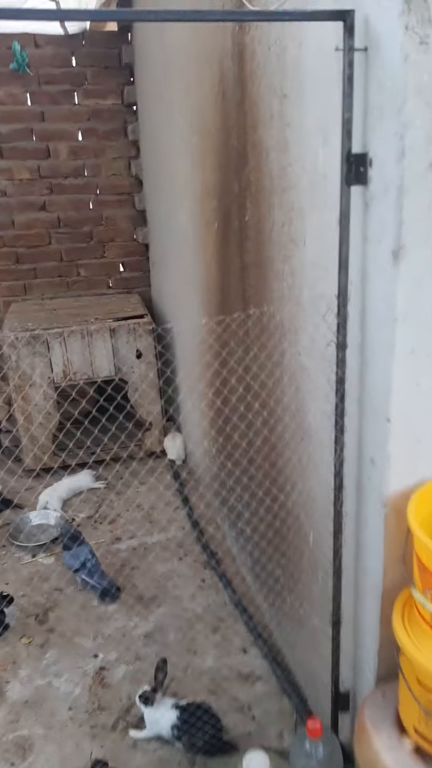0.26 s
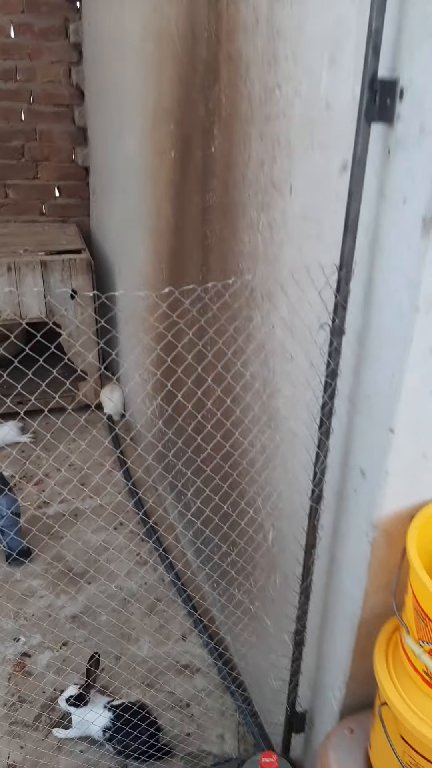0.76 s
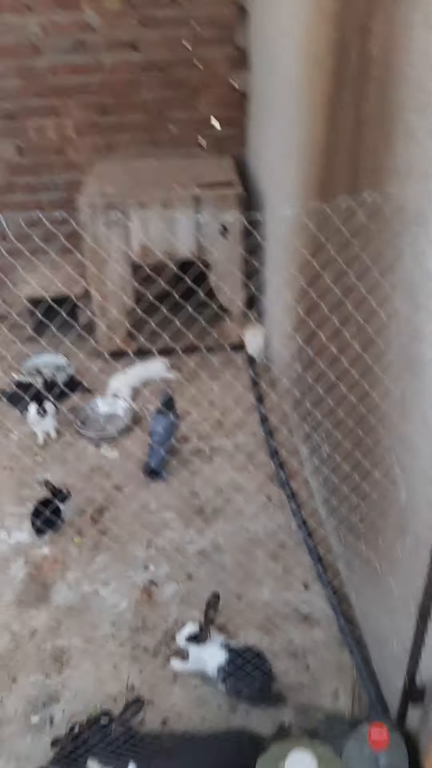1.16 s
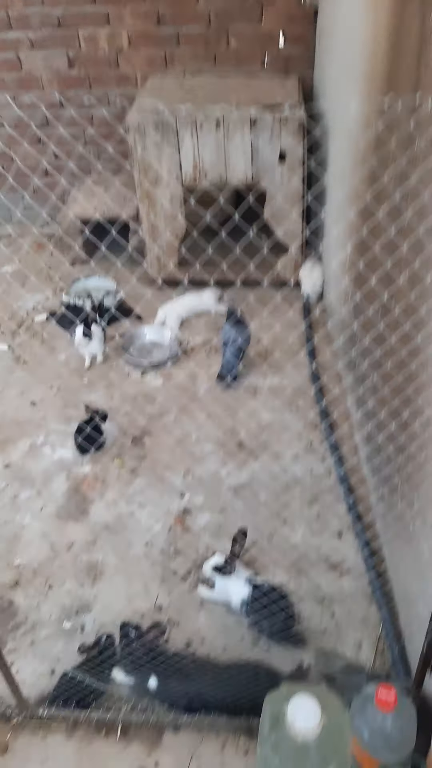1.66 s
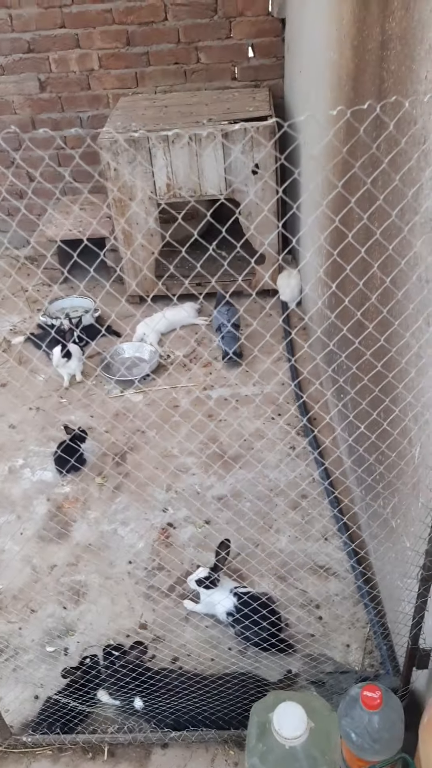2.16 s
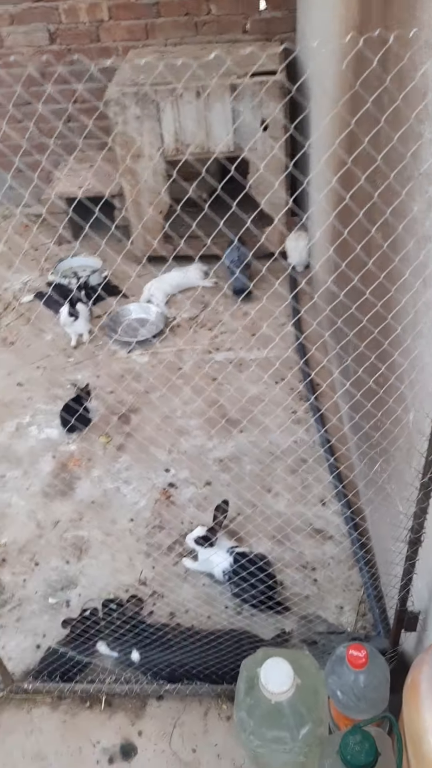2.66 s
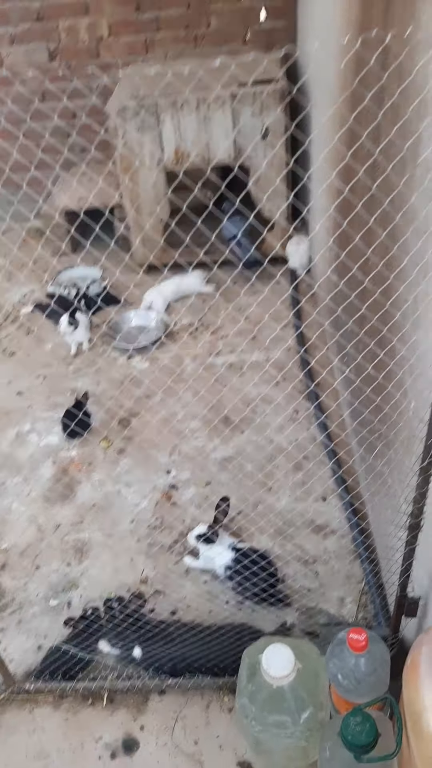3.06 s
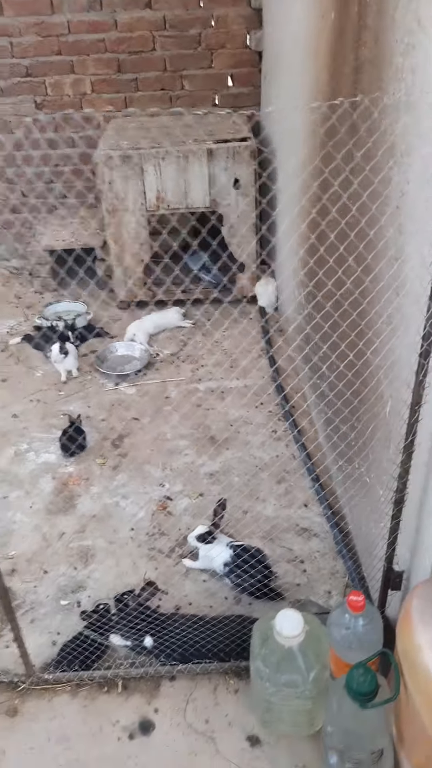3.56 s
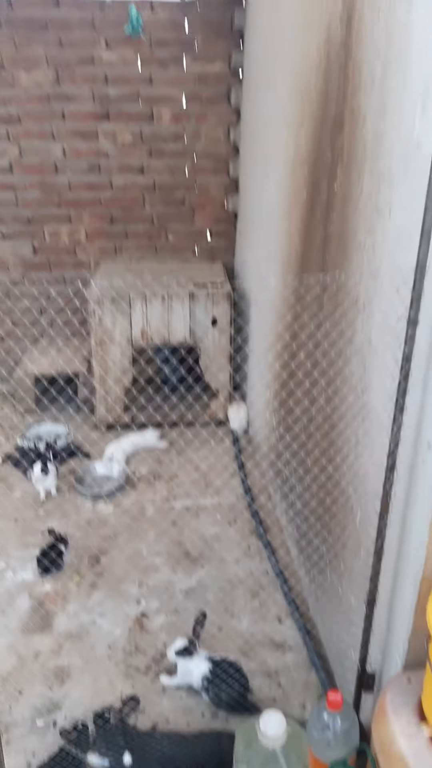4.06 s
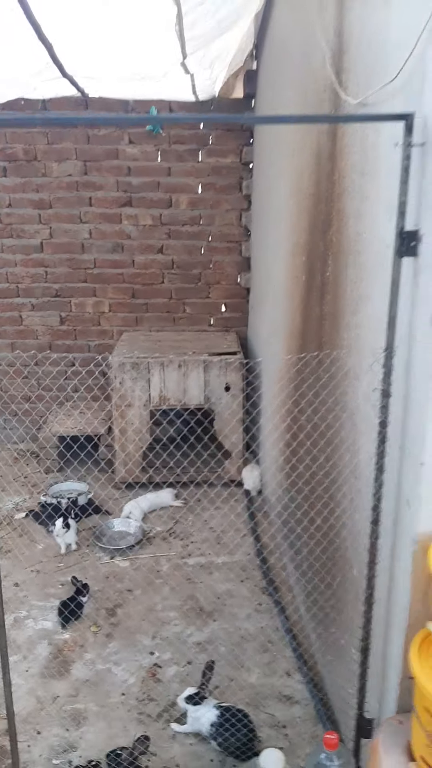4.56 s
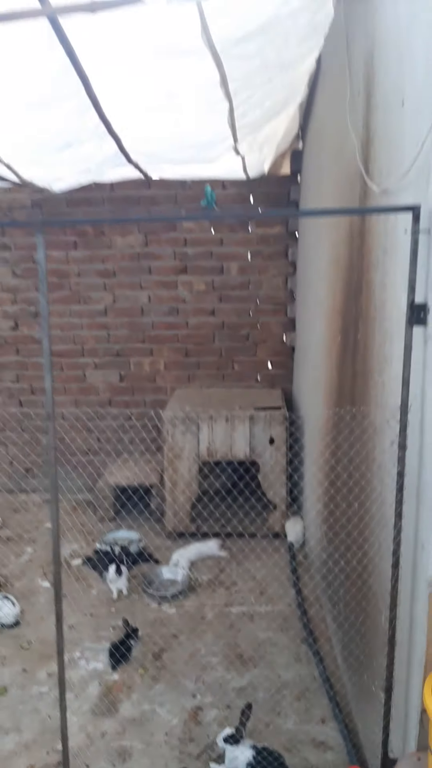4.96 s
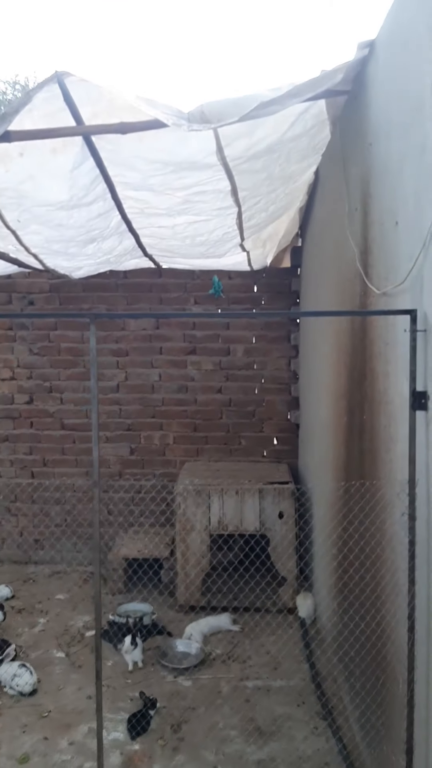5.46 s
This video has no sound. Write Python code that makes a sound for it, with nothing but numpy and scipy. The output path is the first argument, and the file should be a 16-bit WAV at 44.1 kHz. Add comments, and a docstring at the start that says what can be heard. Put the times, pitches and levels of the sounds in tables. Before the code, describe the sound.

Pigeons move around a wooden hutch: a strong boxy thud at the start, airy feather swishes, then a sharp crackly flutter about a second in. The middle is quiet, with thin sparrow chirps echoing softly from outside. Small claw-like clicks and faint wooden bumps return, growing more frequent near the end, where a pure, low coo rolls in and is cut off. Close outdoor stereo pickup with little deep bass.

```python
"""A walled yard with a wooden hutch. From the start pigeons thump on the boards (slaps driving wood resonances)
and rustle their feathers (swelling hiss), among short airy, dull, crackling or rustling bursts (tuned grain
noise), over outdoor noise and a faint hum. Small clicks soon join as brief rings, then sparrows beyond the
wall as chirps and whistles (gliding sines), with echoes scattered by hedges and roofs; near sources echo in
the yard. At the very end one pigeon starts to coo, an almost pure tone rolling in by throbs."""
import sys
import numpy as np
from scipy import signal
from scipy.io import wavfile

SR = 44100
rng = np.random.default_rng(int(sys.argv[2]) if len(sys.argv) > 2 else 0)


def voltage_ratio(decibels):
    """Convert decibels (scalar or array-like) to amplitude ratios, 20 dB per decade."""
    exponent = np.asarray(decibels, float) / 20
    return 10 ** exponent


def digitize_waveform(pressure):
    """Quantize a signal to 16-bit integers and store it at the path in sys.argv[1].

    Rows of a 2-D input are taken as channels; values are limited to [-1, 1].
    """
    field = np.atleast_2d(pressure).T
    bounded = np.clip(field, -1, 1)
    quanta = np.round(bounded * 32767).astype(np.int16)
    wavfile.write(sys.argv[1], SR, quanta)


N = 252693   # length in samples


def rms_one(x):
    """Scale to rms 1."""
    return x / np.sqrt(np.mean(x ** 2) + 1e-20)


def in_time(rows):
    """Table columns as sample-rate curves."""
    s, *columns = np.transpose(rows)
    return [np.interp(np.arange(N) / SR, s, c) for c in columns]


def at_hz(points, hz):
    """Read a spectrum on a log frequency axis."""
    points = np.array(points)
    return np.interp(np.log(hz), np.log(points[:, 0]), points[:, 1])


def drift(rate):
    """Smooth random wandering of rms 1, from noise low-passed near rate [Hz]."""
    r = np.exp(-80 * np.pi * rate / SR)   # runs at one value per 40 samples
    noise = rng.standard_normal(N // 40 + 2002)
    slow = signal.lfilter([1], [1, -2 * r, r * r], noise)[2000:]
    return np.interp(np.arange(N) / 40, np.arange(len(slow)), rms_one(slow))


def resonate(x, modes):
    """Parallel resonances of alternating sign."""
    out = 0
    for k, (hz, width, db) in enumerate(modes):
        r = np.exp(-np.pi * width / SR)
        b = [(1 - r * r) / 2, 0, (r * r - 1) / 2]
        a = [1, -2 * r * np.cos(2 * np.pi * hz / SR), r * r]
        out = out + (-1) ** k * voltage_ratio(db) * signal.lfilter(b, a, x)
    return out


def grains(per_s, spread_db):
    """Dense random clicks of uneven size, rms 1."""
    sizes = voltage_ratio(spread_db * np.minimum(rng.exponential(1, N), 5)) * rng.choice([-1, 1], N)
    return rms_one(sizes * (rng.random(N) < per_s / SR))


# how alike noise is on the two sides: (frequency [Hz], left-right correlation [0 to 1])
LIKENESS = [(60, 0.35), (250, 0.85), (600, 0.4), (1500, 0), (4000, 0), (12000, 0)]


def coloured(spectrum, patchy_db):
    """Half-octave bands of stereo noise, each with its own level, flicker and likeness; rms 1."""
    out, edges = 0, 35 * 2 ** np.arange(0, 9.1, .5)
    white = rng.standard_normal((2, 2, N))
    for k, (low, high) in enumerate(zip(edges, edges[1:])):
        hz = np.sqrt(low * high)
        if hz > spectrum[0][0]:
            band = signal.butter(2, [low, high], "band", fs=SR, output="sos")
            mid, side = signal.sosfilt(band, white[k % 2])   # neighbouring bands use different noise
            alike = np.clip(at_hz(LIKENESS, hz), -1, 1)
            gain = voltage_ratio(at_hz(spectrum, hz) + patchy_db * drift(12.7))
            stereo = np.sqrt(1 + alike) * mid + np.sqrt(1 - alike) * side * [[1], [-1]]
            out = out + gain * stereo
    return rms_one(out)


# wing beats on the hutch: (time [s], lower body level [dB], upper body level [dB], length [s])
THUMPS = [(0.0, -39.5, -43, 0.069), (1.181, -69, -68.5, 0.28), (2.317, -70, -66.5, 0.015),
          (2.795, -57.5, -68, 0.17), (3.267, -57, -62, 0.098), (3.739, -51, -62.5, 0.046),
          (3.794, -79, -64, 0.052), (4.522, -54, -58.5, 0.038), (4.588, -67.5, -72, 0.087),
          (4.884, -101, -68.5, 0.047), (5.25, -47, -57, 0.035), (5.315, -56.5, -66, 0.048),
          (5.429, -53.5, -67, 0.013), (5.601, -50, -57, .14)]
# low resonances of the hutch: (frequency [Hz], width [Hz], relative level [dB])
HUTCH = [(115, 37, -1.5), (211.6, 36.6, 0), (216.4, 67, 0), (300, 76.5, -3.5), (440.5, 26.4, -9)]
# high resonances of the hutch: (frequency [Hz], width [Hz], relative level [dB])
HUTCH_UPPER = [(490, 68, -1), (800, 280, 1), (1080, 323, 3.5), (1840, 1500, -5), (2454, 980, -7)]


def thumps():
    """Each beat is a slap of many small contacts that drives the hutch while the wing presses, then dies."""
    rise_s, fall_s, press_decay_s = 0.00035, 0.04, 0.18
    low, upper, t = np.zeros(N), np.zeros(N), np.arange(SR // 2) / SR
    for s, db, upper_db, length in THUMPS:
        release = np.maximum(t - abs(length), 0) / fall_s
        shape = (1 - np.exp(-t / rise_s)) * np.exp(-release - t / press_decay_s)
        at = int(s * SR)
        low[at:at + len(t)] += voltage_ratio(db) * shape[:N - at]
        upper[at:at + len(t)] += voltage_ratio(upper_db) * shape[:N - at]
    contacts = grains(1500.0, 4.3)
    # small parts sound from apart
    scattered = contacts + 0.76 * np.array([grains(1300.0, 2.5), grains(1500.0, 1.0)])
    # each body is levelled by its response to the steady contacts
    low_scale, upper_scale = [1 / np.std(resonate(contacts, modes)) for modes in (HUTCH, HUTCH_UPPER)]
    bass_cut = signal.butter(2, 85, "high", fs=SR, output="sos")
    low_body = low_scale * signal.sosfilt(bass_cut, resonate(low * contacts, HUTCH))
    upper_body = upper_scale * resonate(upper * scattered, HUTCH_UPPER)
    return (low_body + upper_body) * voltage_ratio(np.array([[2.5], [-2.5]]))   # leans left


# short rushes of coloured noise, heard as air, dull thumps, a crackle and rustling:
# (time [s], length [s], frequency [Hz], width of each of two passes [Hz], level [dB])
BURSTS = [(.0, 0.32, 1440, 1920, -55.5), (0.048, 0.46, 251, 118, -56), (0.424, 0.47, 1860, 870, -67.5),
          (0.908, 0.067, 1900, 800, -48.5), (.912, .045, 4370, 300, -51.5), (0.916, 0.15, 267, 455, -55.5),
          (0.957, 0.041, 2450, 1710, -40.5), (0.987, 0.034, 2450, 1220, -42.5),
          (1.227, 0.24, 1840, 1280, -69.5), (1.546, 0.17, 5640, 2630, -66.5), (1.899, 0.071, 435, 800, -57),
          (2.684, 0.2, 346, 192, -69), (2.914, 0.035, 620, 800, -48), (2.916, 0.014, 6200, 2400, -47.5),
          (4.69, 0.59, 2010, 524, -72.5), (4.99, 0.28, 1640, 450, -61.5), (5.371, 0.066, 1840, 886, -63.5),
          (3.468, 0.062, 650, 250, -65), (5.428, .09, 370, 243, -59.5), (5.536, 0.065, 300, 199, -56),
          (5.644, 0.14, 2140, 1230, -62), (5.596, 0.13, 480, 152, -52)]


def noise_bursts():
    """Grainy noise, swelling and dying away, each burst coloured by its own resonance."""
    out = np.zeros((2, N))
    grit = grains(4000.0, 2.7) + 1.22 * np.array([grains(4000.0, 3.2), grains(4000.0, 4.9)])
    for s, length, hz, width, db in BURSTS:
        at = int(s * SR)
        piece = grit[:, at:at + int(length * SR)]
        colour = [(hz, width, 0)]
        swell = np.sqrt(np.sin(np.linspace(0, np.pi, piece.shape[1])).clip(0))
        burst = rms_one(resonate(resonate(piece, colour), colour))
        out[:, at:at + piece.shape[1]] += voltage_ratio(db) * swell * burst
    return out


# colour of the feather hiss: (frequency [Hz], relative level per Hz [dB])
HISS = [(1760, -46), (3000, 4.5), (3260, -7), (4430, -8.5), (5270, -3), (6810, -8.5), (8750, -17.5),
        (12800, -13), (15800, -7.5)]
# birds shuffling all about, as a steady hiss: (time [s], level [dB])
SHUFFLE = [(0, -64), (.3, -62), (.8, -67.5), (1.3, -68), (2.1, -80.5), (2.8, -74.5), (3.5, -69.5),
           (3.85, -60.5), (4.2, -67), (4.7, -68.5), (5.1, -69.5), (5.73, -70)]
# shakes of the feathers: (time of the peak [s], peak level [dB], swell [s], fade [s])
RUSTLES = [(0, -45.5, .01, 0.066), (.305, -50, 0.08, 0.032), (.63, -56, 0.14, 0.058),
           (0.899, -48.5, 0.0084, 0.097), (.995, -46, 0.068, 0.037), (1.2, -62.5, 0.033, 0.026),
           (1.9, -53, 0.017, 0.043), (2.18, -68.5, .003, 0.098), (2.34, -64.5, 0.03, .12),
           (2.92, -48, 0.0071, 0.025), (3.193, -58, 0.048, 0.025), (3.29, -52.5, 0.0024, 0.019),
           (3.59, -69, 0.0066, .15), (4.0, -56, 0.019, 0.031), (4.332, -58.5, 0.0089, 0.028),
           (4.515, -59.5, 0.0057, 0.014), (4.82, -62.5, 0.028, 0.025), (4.87, -60.5, 0.018, 0.12),
           (5.2, -63.5, 0.0097, 0.047), (5.41, -60.5, 0.038, .04)]


def feathers():
    """Fine hiss off the barbs, a little to the right: each shake swells and fades over the shuffling."""
    t, power = np.arange(N) / SR, voltage_ratio(in_time(SHUFFLE)[0]) ** 2
    for s, db, swell, fade in RUSTLES:
        distance = np.where(t < s, (s - t) / abs(swell), (t - s) / abs(fade))
        power = power + voltage_ratio(db) ** 2 * np.exp(-2 * distance)
    return np.sqrt(power) * coloured(HISS, patchy_db=1.7) * voltage_ratio(np.array([[-1.2], [1.2]]))


# the yard's low stir: (time [s], level [dB])
STIR = [(0, -38), (.5, -64.5), (1.3, -68), (1.5, -68.5), (2.1, -71.5), (2.7, -73.5), (3.6, -65.5),
        (4.2, -70), (4.9, -72.5), (5.2, -67), (5.73, -64.5)]
# colour of the outdoor air: (frequency [Hz], relative level per Hz [dB])
YARD = [(24, -36), (40, -2), (151, -6.5), (422, -8), (467, -12.5), (965, -12.5), (1070, -75), (1370, -10.5),
        (2500, -28.5), (4460, -34), (16000, -57)]


def background():
    """Outdoor air noise, and a faint wavering hum from far off made of noise through a narrow resonance."""
    hum = [(1040, 16, 0)]   # (frequency [Hz], width of each pass [Hz], level [dB])
    tone = rms_one(resonate(resonate(rng.standard_normal(N), hum), hum))
    air = voltage_ratio(in_time(STIR)[0]) * coloured(YARD, patchy_db=3.0)
    return air + voltage_ratio(-84 + 0.5 * drift(9.2)) * tone


# small clicks of claws and quill tips: (time [s], level before the decay [dB], ringing frequency [Hz])
TICKS = [(0.082, -34.5, 7000), (0.161, -30.5, 5800), (0.177, -47, 6870), (1.145, -49.5, 1040),
         (2.18, -53, 5000), (2.324, -62, 2200), (2.917, -35, 6500), (3.293, -33.5, 6760), (3.59, -41, 6760),
         (4.141, -36, 12000), (4.06, -52.5, 1090), (4.296, -50, 2200), (4.338, -44.5, 1300),
         (4.509, -45, 9000), (4.613, -45, 2360), (4.666, -38.5, 6700), (4.816, -38, 6600)]


def ticks():
    """Each short click is a sine that dies within about a cycle."""
    cycles = 0.9   # decay time, in periods of the ring
    out, t = np.zeros(N), np.arange(400) / SR
    for s, db, hz in TICKS:
        at = int(s * SR)
        out[at:at + 400] += voltage_ratio(db) * np.sin(2 * np.pi * hz * t) * np.exp(-t * hz / cycles)
    return out


def sparrows(notes, held):
    """Near-sine glides, pitch and level fluttering fast; whistles fade as they fall, steep chirps blow harder."""
    fall_hz_per_s, shortest_fall_s = 17000, .05   # end of a whistle
    chirp_bend, steep_hz_per_s = 1.25, 60000   # flattening of a chirp; slope that adds power
    out, waver = np.zeros(N), drift(300)
    for s, length, from_hz, to_hz, db in notes:
        u, at = np.linspace(0, 1, int(length * SR)), int(s * SR)
        if held:
            fall_s = max(abs(from_hz - to_hz) / fall_hz_per_s, shortest_fall_s)
            fall = min(fall_s / length, 1)   # share of the note spent gliding
            fallen = np.sin(np.pi / 2 * (1 - (1 - u) / fall).clip(0)) ** 2
        else:
            fallen = 1 - (1 - u) ** chirp_bend
        hz = from_hz + (to_hz - from_hz) * fallen
        if held:
            effort = 1 - .1 * fallen
            rough = .008 + .045 * fallen   # a held pitch is steady
        else:
            slope = abs(np.gradient(hz)) * SR
            effort = np.sqrt(1 + np.minimum(slope / steep_hz_per_s, 2))
            rough = .036
        shape = np.sin(np.pi * u).clip(0) ** .4
        phase = 2 * np.pi * np.cumsum(hz * (1 + rough * waver[at:at + len(u)])) / SR
        out[at:at + len(u)] += voltage_ratio(db) * effort * shape * np.sin(phase)
    return out * voltage_ratio(4.0 * drift(150))


# sparrow chirps: (time [s], length [s], start frequency [Hz], end frequency [Hz], level [dB])
CHIRPS = [(0.274, 0.033, 4300, 2670, -57.5), (.458, 0.033, 4200, 2840, -57), (0.792, 0.06, 3780, 3360, -64),
          (1.108, 0.027, 3660, 3120, -73), (1.531, 0.035, 4670, 3840, -52.5),
          (1.862, 0.033, 2860, 2500, -67), (1.538, 0.042, 3500, 2770, -64.5), (2.2, 0.012, 6260, 5320, -61),
          (2.243, 0.014, 6300, 4380, -58), (2.264, 0.011, 6750, 5800, -69),
          (2.288, 0.012, 4190, 6150, -56.5), (2.304, 0.0093, 5090, 3710, -45),
          (2.314, 0.011, 4250, 2780, -64), (2.319, .008, 5500, 6930, -64),
          (2.325, 0.0054, 2800, 3940, -54.5), (2.364, 0.029, 4490, 3090, -49.5),
          (3.016, 0.0136, 5630, 4100, -59.5), (3.036, 0.019, 3700, 2780, -65.5),
          (3.064, 0.016, 3810, 2600, -67), (3.077, 0.012, 5450, 5100, -58),
          (3.158, 0.036, 2800, 2390, -71.5), (3.426, 0.047, 2630, 2210, -69),
          (3.527, 0.044, 3190, 3940, -64), (3.555, 0.042, 3370, 3150, -63.5),
          (3.94, 0.069, 5740, 4700, -57), (4.033, 0.049, 3080, 2890, -74), (4.858, 0.0064, 6140, 4900, -54),
          (4.861, 0.018, 4860, 4090, -50), (4.9, 0.014, 4620, 4300, -75), (5.026, 0.014, 5020, 3430, -54),
          (5.658, 0.035, 4690, 4970, -63.5)]


def sparrow_chirps():
    """Quick glides that flatten out."""
    return sparrows(CHIRPS, held=False)


# sparrow whistles: (time [s], length [s], held frequency [Hz], end frequency [Hz], level [dB])
WHISTLES = [(.294, .055, 2780, 2550, -57), (.472, .06, 2870, 2750, -59), (.505, .13, 4050, 2300, -60),
            (.675, .095, 3920, 3400, -60), (.718, .066, 2720, 2680, -60), (.852, .055, 3900, 3600, -57),
            (1.026, .085, 3990, 3300, -53), (1.135, .068, 3700, 2850, -60), (1.395, .122, 3900, 2650, -60),
            (1.565, .115, 3900, 2550, -59), (1.695, .075, 4550, 2700, -57), (1.778, .08, 4000, 3600, -55),
            (2.207, .016, 5450, 5500, -59), (2.27, .045, 3000, 2950, -69), (2.33, .012, 3750, 3200, -53),
            (2.635, .059, 2330, 1930, -70), (3.541, .082, 3880, 3100, -64), (3.735, .07, 4050, 3800, -60),
            (3.993, .08, 4040, 3400, -56), (4.3, .04, 4960, 5000, -65), (4.445, .065, 4310, 3400, -64),
            (4.618, .04, 4280, 3410, -60), (4.935, .075, 3650, 2750, -61), (4.97, .082, 4050, 3450, -53),
            (5.128, .055, 3500, 3100, -59), (5.155, .04, 2740, 2550, -59), (5.375, .08, 3900, 3000, -58),
            (5.688, .03, 2700, 2950, -54)]


def sparrow_whistles():
    """Notes whose pitch is held, where long enough, then glides to its end."""
    return sparrows(WHISTLES, held=True)


# throbs by which the coo rolls in: (time [s], peak level of each throb [dB])
THROBS = [(5.637, -43), (5.656, -43.5), (5.674, -40), (5.688, -40), (5.707, -23.5), (5.726, -28)]


def coo():
    """The swollen crop sounds an almost pure tone in throbs that start fast and fade slower."""
    rise_s, fall_s = 0.0021, 0.0079
    quiet_hz, hz_per_db = 320, 2.5   # pitch at -45 dB, rising with effort
    t = np.arange(N) / SR
    level = np.zeros(N)
    for s, db in THROBS:
        spread = np.where(t < s, rise_s, fall_s)
        level += voltage_ratio(db) * np.exp(-.5 * ((t - s) / spread) ** 2)
    effort_db = in_time(THROBS)[0]
    phase = 2 * np.pi * np.cumsum(quiet_hz + hz_per_db * (effort_db + 45)) / SR
    return np.sqrt(2) * level * (np.sin(phase) + 0.0173 * np.sin(2 * phase))


def echoes(x, t60):
    """Dense scattered reflections, dying away and dulled by the walls; long waves reach both sides alike."""
    wall_cut_hz, build_s = 5900, .004
    t = np.arange(SR) / SR
    shared, apart = rng.standard_normal(SR), rng.standard_normal((2, SR))
    noise = signal.lfilter(*signal.butter(1, 500, fs=SR), shared - apart) + apart   # shared in the bass
    tail = noise * voltage_ratio(-60 * t / t60) * (1 - np.exp(-t / build_s))
    tail = signal.lfilter([1], [1, -np.exp(-2 * np.pi * wall_cut_hz / SR)], tail)
    tail = tail / np.sqrt(np.sum(tail ** 2) / 2)
    return signal.fftconvolve(x[None], tail, axes=1)[:, :N]


def scene():
    """Near sources echo in the yard; the sparrows reach it scattered by hedges and roofs."""
    yard_t60_s, hedge_t60_s, hedge_cut_hz = 0.43, .3, 4200
    beats, bursts, clicks, call = thumps(), noise_bursts(), ticks(), coo()
    chirps, whistles = sparrow_chirps(), sparrow_whistles()
    birds = chirps + whistles
    direct = np.array([voltage_ratio(-2.5) * np.roll(birds, 3), birds])   # left is softer and 3 samples late
    near = voltage_ratio(-5.0) * beats.mean(0) + voltage_ratio(-13) * bursts.mean(0) + voltage_ratio(-2.5) * clicks + voltage_ratio(-7.5) * call
    far = voltage_ratio(-6) * whistles + voltage_ratio(-1.5) * chirps
    leafy = signal.lfilter(*signal.butter(2, hedge_cut_hz, fs=SR), far)
    echo = echoes(near, yard_t60_s) + echoes(leafy, hedge_t60_s)
    return beats + bursts + feathers() + background() + clicks + direct + call + echo


def roll_off(x):
    """The treble ends steeply here."""
    return signal.sosfilt(signal.butter(12, 16510, fs=SR, output="sos"), x)


def record(dry):
    """The microphone loses the deepest bass and the top."""
    bass_cut = signal.butter(3, 58, "high", fs=SR, output="sos")
    top_cut = signal.cheby2(12, 40, 16000, fs=SR, output="sos")
    mix = signal.sosfilt(top_cut, signal.sosfilt(bass_cut, dry))
    return roll_off(mix)


dry = scene()
out = record(dry)
digitize_waveform(out)
```